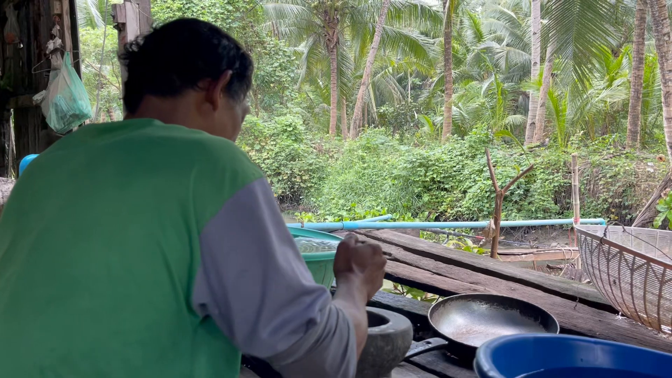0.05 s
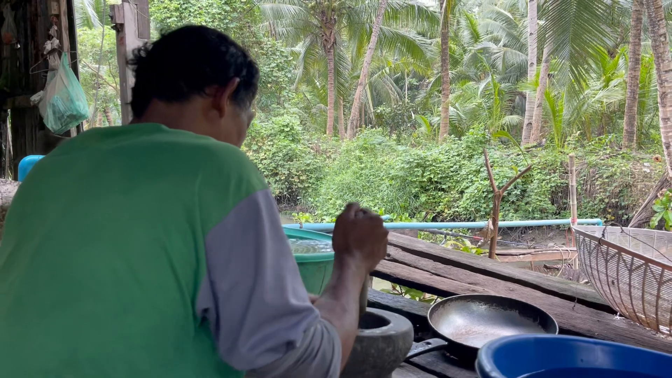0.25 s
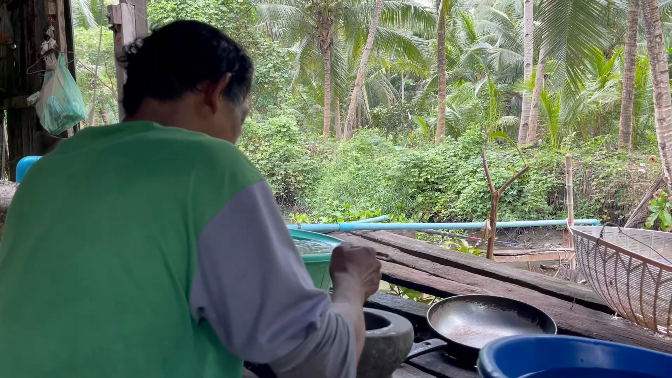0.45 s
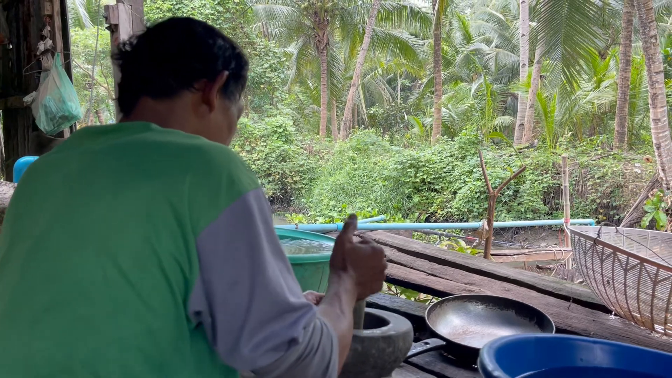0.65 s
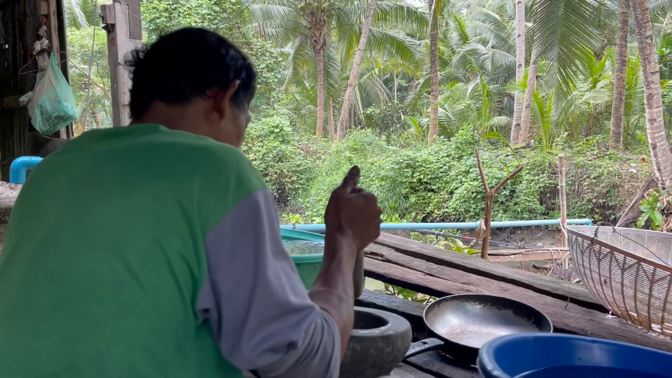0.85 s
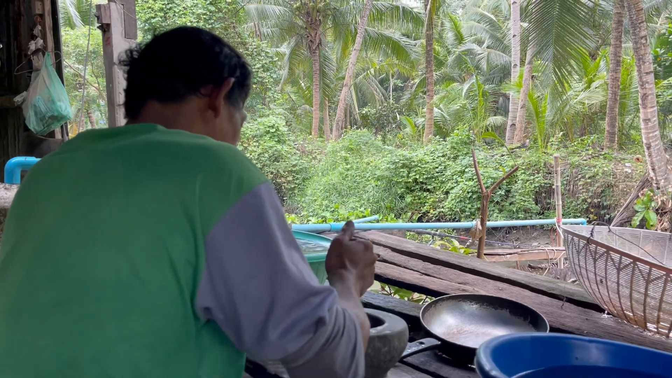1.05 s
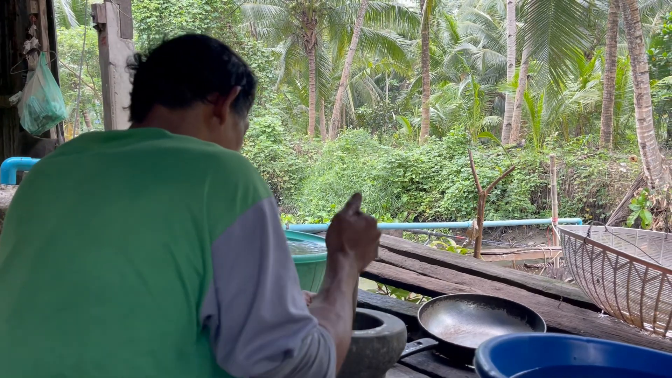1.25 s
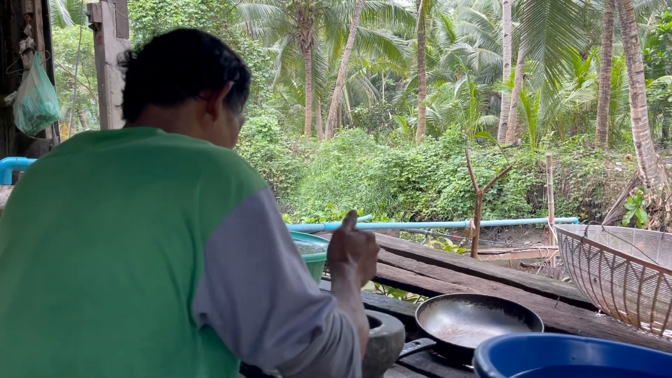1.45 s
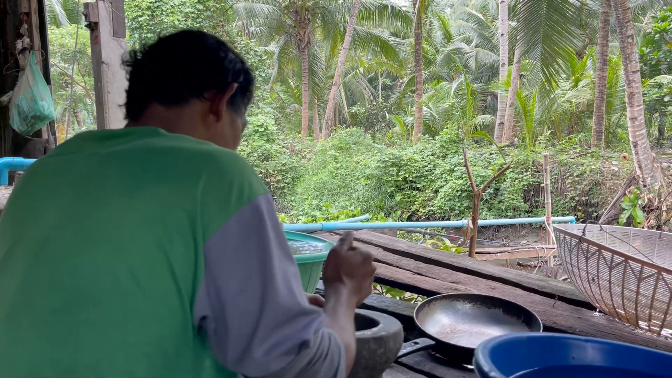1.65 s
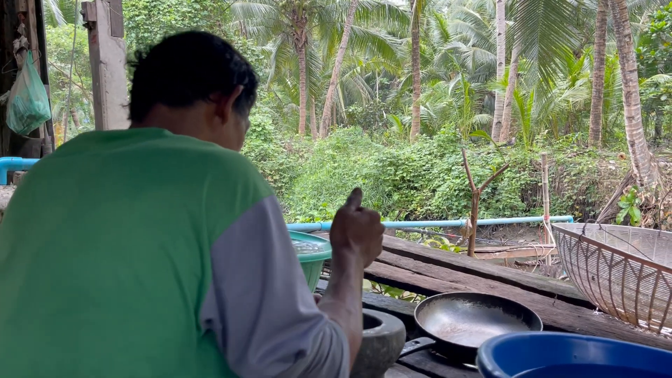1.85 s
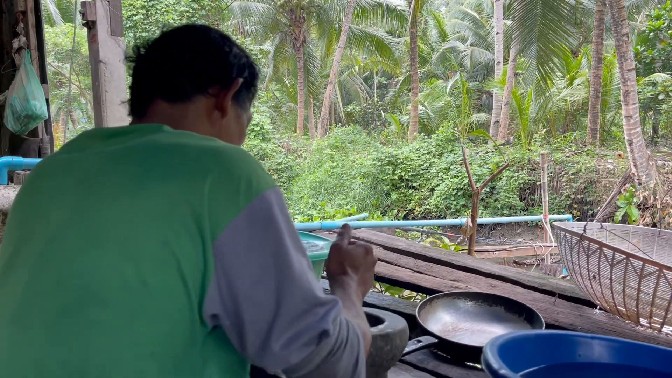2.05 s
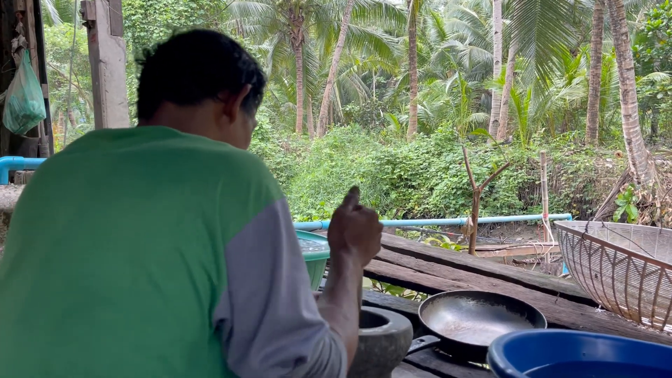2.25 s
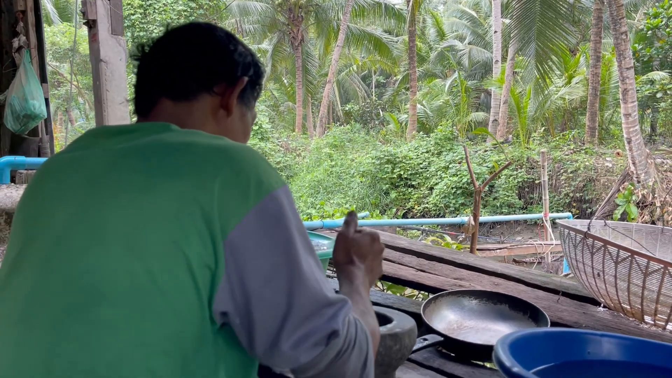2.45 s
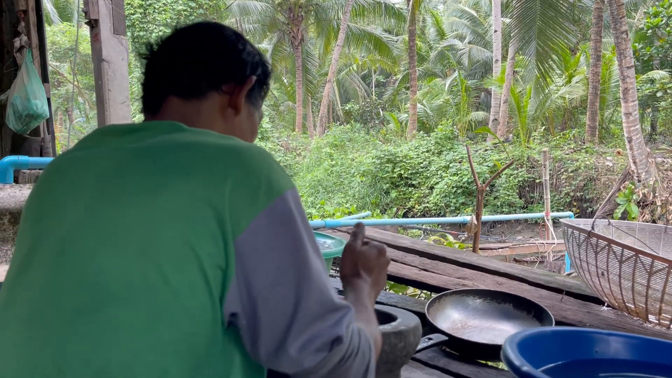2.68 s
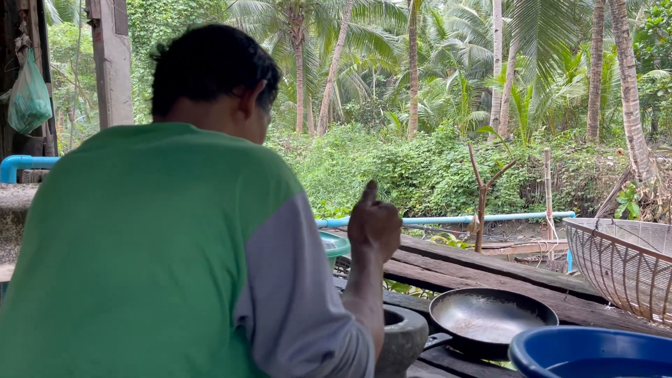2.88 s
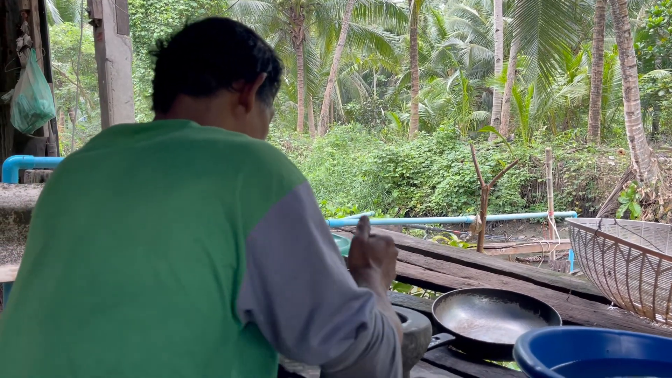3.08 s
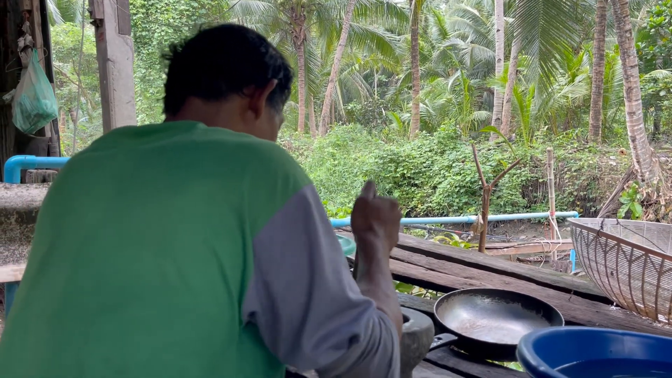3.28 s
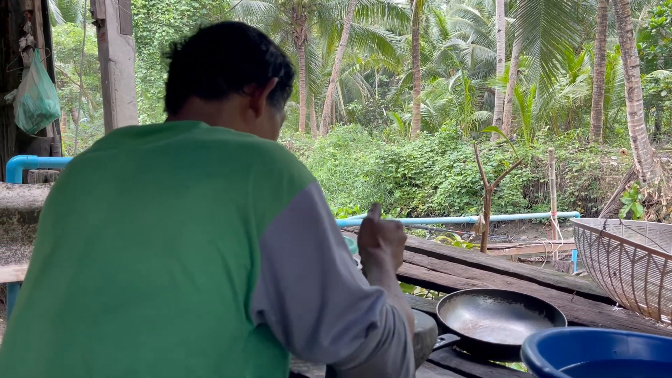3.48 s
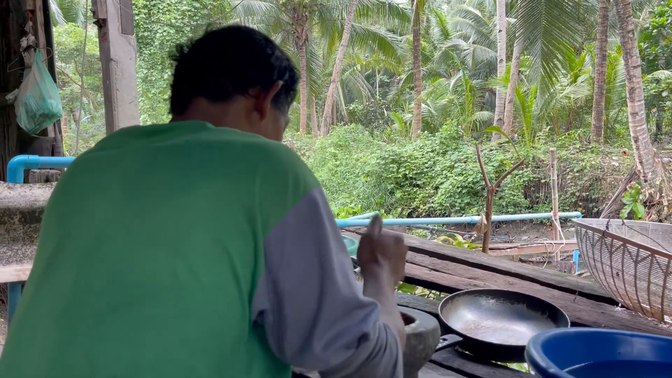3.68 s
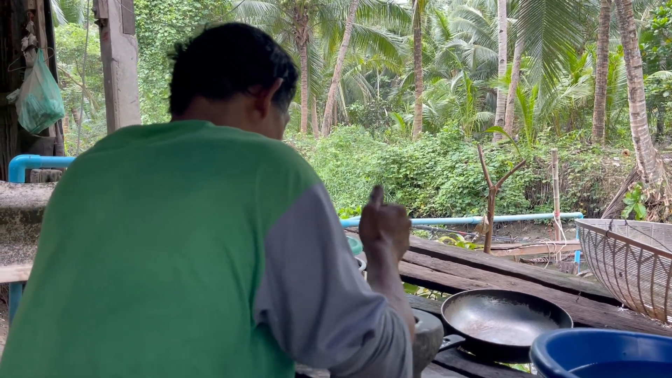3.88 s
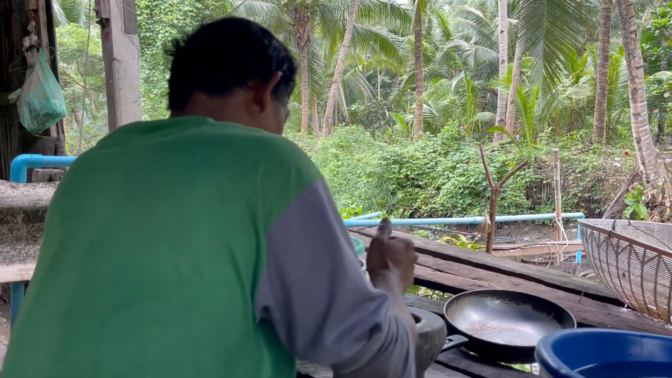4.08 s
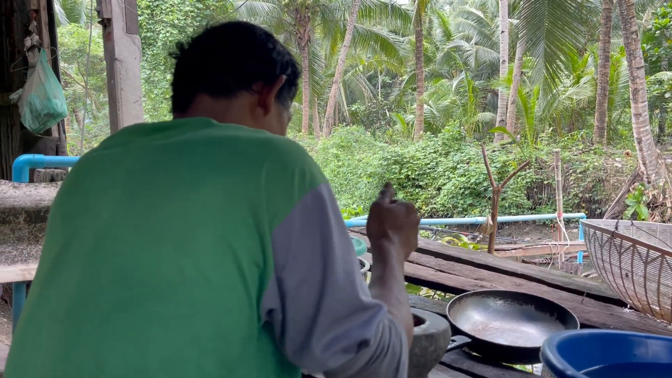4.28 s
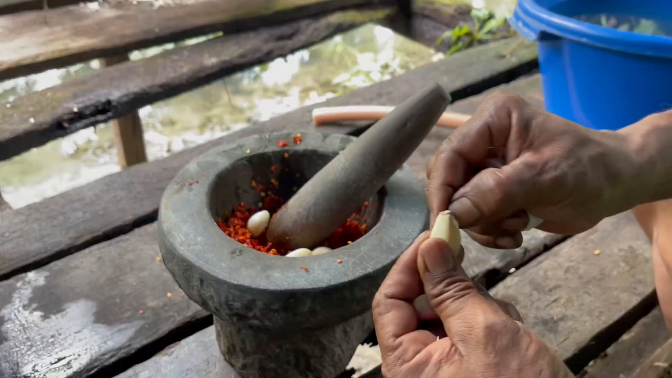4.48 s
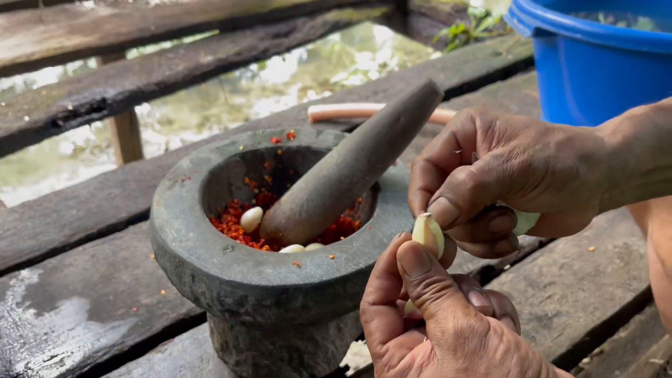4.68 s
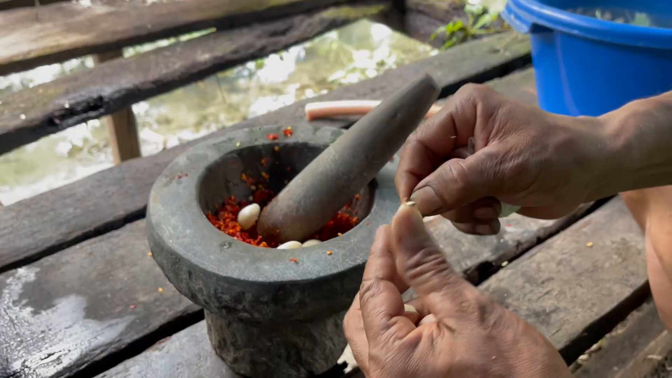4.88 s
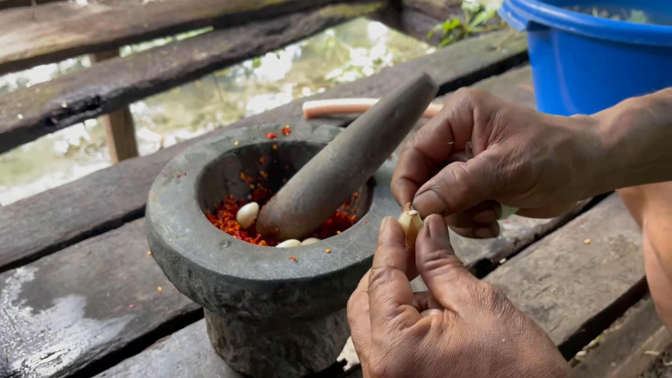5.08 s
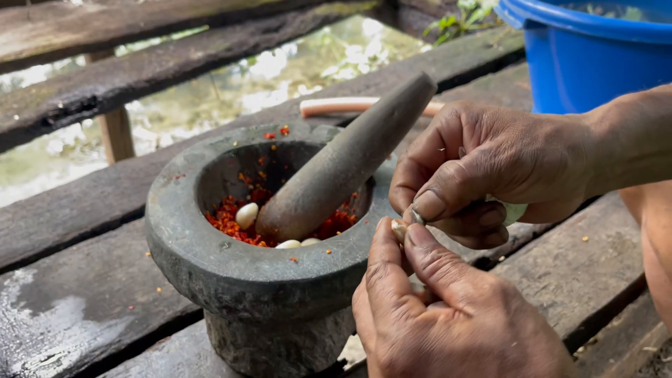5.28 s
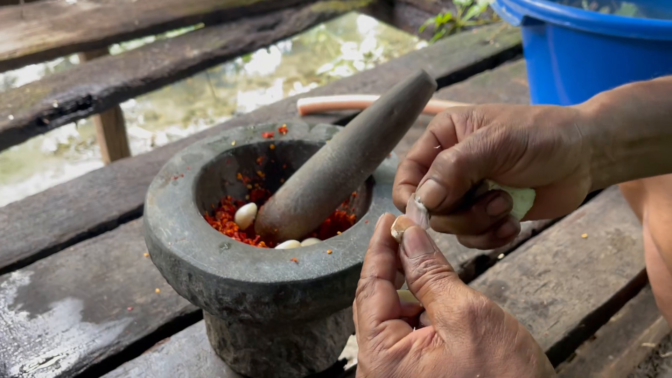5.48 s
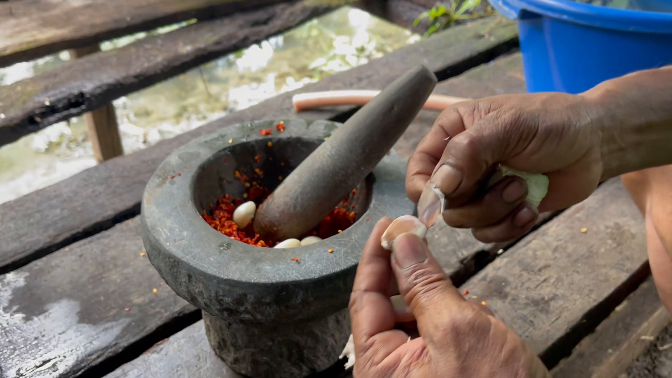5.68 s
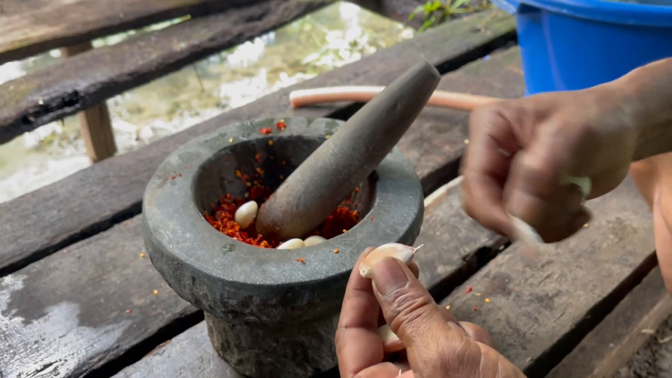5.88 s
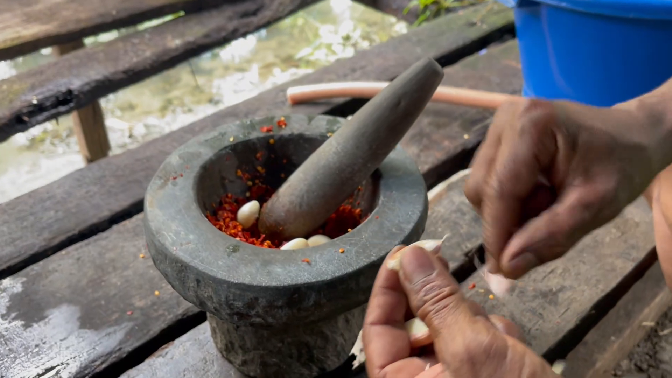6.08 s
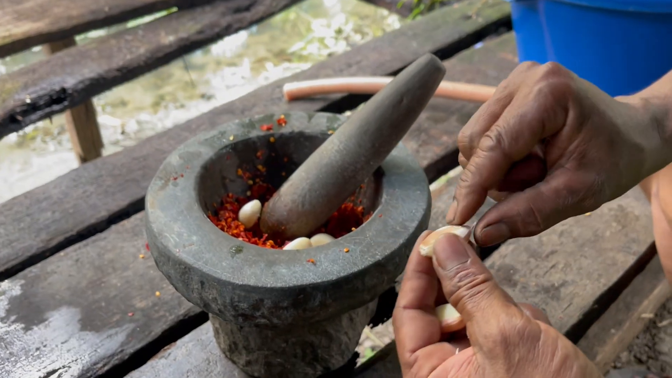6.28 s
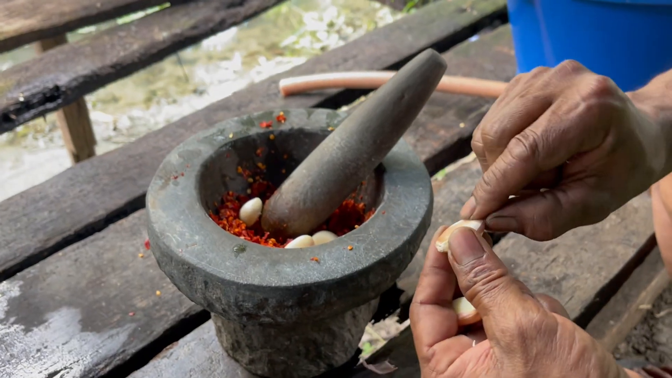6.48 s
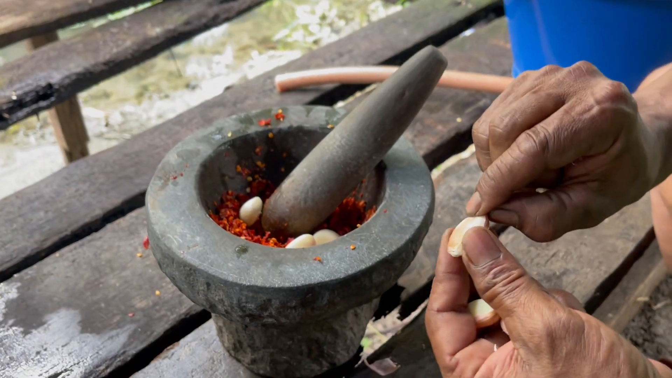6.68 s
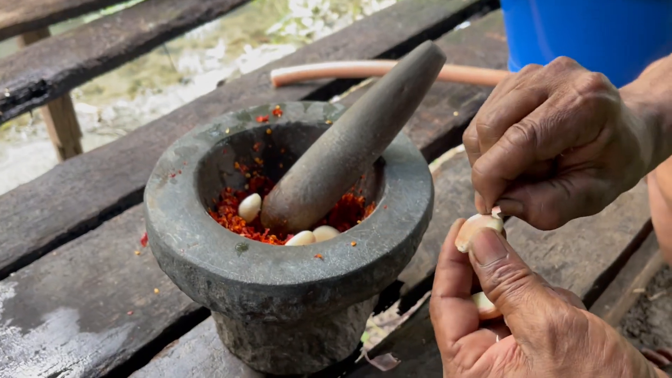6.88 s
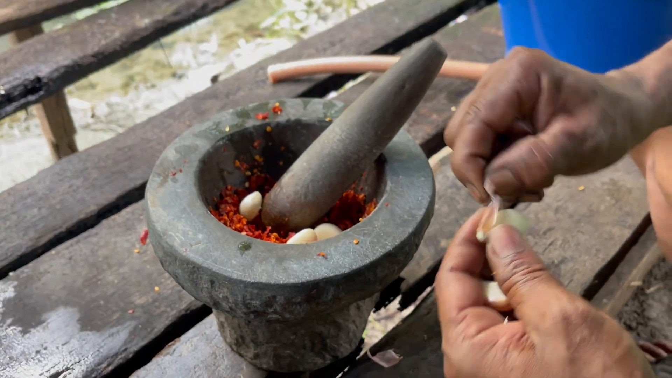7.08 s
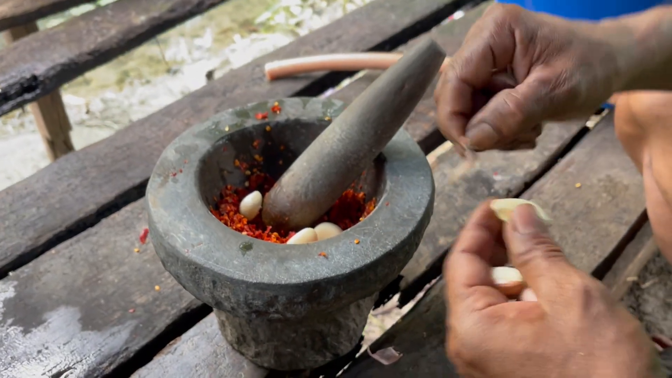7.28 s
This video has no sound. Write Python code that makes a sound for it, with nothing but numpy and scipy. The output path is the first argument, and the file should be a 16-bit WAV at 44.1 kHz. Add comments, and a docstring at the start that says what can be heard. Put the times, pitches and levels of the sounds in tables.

```python
"""A plank deck under an open roof among trees: a stone pestle pounds dried chillies in a stone mortar.
After a cut the two-port microphone is close to hands peeling garlic; a loose board chatters and knocks.
An engine drones far away in both parts, behind the noise of leaves, insects and distant rumble.
Impacts are impulses driving dying sines, rubs and rasps are coloured grains of noise,
the engine is a few wavering sines, and the yard answers with late scattered reflections."""
import sys
import numpy as np
from scipy import signal
from scipy.fft import rfft, irfft
from scipy.io import wavfile
from scipy.ndimage import uniform_filter1d

SR = 44100
rng = np.random.default_rng(int(sys.argv[2]) if len(sys.argv) > 2 else 0)


def put_to_file(sound):
    """Save the sound as 16-bit audio at rate SR, in the file named by the first command-line argument."""
    columns = np.atleast_2d(sound).T  # one column per channel
    safe = np.clip(columns, -1, 1)
    whole_steps = np.round(safe * 32767)
    wavfile.write(sys.argv[1], SR, whole_steps.astype(np.int16))


N = 324042

# Silence between the two parts: (start t/s, end t/s)
CUT = (4.4535, 4.4855)
# Air colour of the two parts, each: (f/Hz, relative level/dB per Hz)
AIR_COLOURS = [
    [(12, -41.5), (20, -17.5), (88, -4.5), (222, -22.5), (802, -27), (1000, -27.5), (1290, -29),
     (1610, -34), (1860, -32), (3740, -40.5), (8890, -39), (11400, -41.5), (16000, -89)],
    [(12, -52.5), (20, -6), (70, -0.5), (150, -13), (377, -16), (485, -23.5), (923, -27.5), (2390, -40.5),
     (4060, -43), (6180, -55), (9140, -38.5), (13500, -61.5), (16000, -61)],
]
# Air loudness: (t/s, level/dB)
AIR_LEVEL = [(0, -55), (4.45, -51), (4.49, -47.5), (5.5, -52), (6.2, -52.5), (7.35, -52)]
# Far engine, one list for each part: (t/s, firing rate f/Hz, level/dB)
ENGINE_RUNS = [
    [(0.0, 83.87, -55), (2.27, 93.8, -52), (3.3, 100, -51), (4.46, 101.2, -52.5)],
    [(4.48, 70.7, -47), (5.5, 72, -49.5), (6.22, 70.44, -54), (6.5, 61.97, -54.5), (7.35, 59, -51.5)],
]
# Engine orders: (multiple of the firing rate, relative level/dB)
ENGINE_ORDERS = [(.5, -8), (1, 2.5), (2, -10), (2.5, -14.5), (3.5, -23)]
# Thin hiss, perhaps insects: (start t/s, swell t/s, hold t/s, fade t/s, level/dB)
THIN_HISSES = [(5.85, .1, 0.92, .1, -76)]
# Colour of the thin hiss: (f/Hz, relative level/dB)
THIN_COLOUR = [(3000, -40), (3600, -8), (3950, 0), (4300, -10), (5000, -40)]

# Phase between the microphone ports: (f/Hz, lead of the left port/rad)
PORT_LEAD = [(20, 0), (3000, .6), (8000, .8), (11700, -6.2), (16400, -12.7)]
# Left-right likeness of diffuse sound: (f/Hz, likeness 0 to 1)
PORT_LIKENESS = [(60, 1), (300, 0.61), (1500, 0.17), (4000, 0.52), (9000, 0.77)]
# Late reflections of the yard: (f/Hz, t60/s)
YARD_DECAY = [(100, .4), (300, .36), (800, .27), (2000, .3), (5000, .2), (12000, .15)]
# Nearby boards, posts and roof: (delay t/ms, left level/dB, right level/dB)
NEAR_ECHOES = [(2.52, -40, -14), (4.69, -19, -9), (6.26, -10, -40), (9.76, -8, -8), (13.42, -19, -40),
               (17.48, -18, -15), (20.6, -22, -19), (23.62, -40, -29), (28.17, -24, -33), (33.05, -20, -40),
               (37.85, -26, -40), (41.47, -24, -27)]

# Short rasps, perhaps something dragged: (start t/s, swell t/s, hold t/s, fade t/s, level/dB)
RASP_STROKES = [(.64, .12, .13, 0.11, -61.5), (4.726, 0.02, 0.0266, 0.12, -43.5)]
# Rasp colour after the cut: (f/Hz, relative level/dB per Hz)
RASP_COLOUR = [(290, -40), (500, -8.5), (645, -13.5), (719, -4.5), (1150, -24), (1220, -17), (1700, -1.5),
               (2130, -6), (2620, -15.5), (2960, -4), (3140, -27), (4920, -14), (5350, -18.5), (9000, -17),
               (11700, -54), (19800, -120)]
# Colour of the fainter rasp before the cut: (f/Hz, relative level/dB per Hz)
SCUFF_COLOUR = [(530, -28), (900, 1), (998, -17.5), (1260, -0.5), (1610, -15.5), (1880, -9.5),
                (2170, -17.5), (2510, -2), (2940, -15.5), (6000, -25), (7800, -54.5), (13200, -120)]
# Hollow bump at the start of a rasp: (f/Hz, relative level/dB, t60/s)
BUMP_MODES = [(330, 13, .03), (770, 4.5, 0.082), (1440, 2, .025), (1900, -5, .02)]

# Touches of a metal pan: (t/s, level/dB)
PAN_TOUCHES = [(4.513, -46)]
# Modes of the pan: (f/Hz, relative level/dB, t60/s)
PAN_MODES = [(460, 0.00056, 0.38)]
# Knocks of the loose board: (t/s, body level/dB, click level/dB)
BOARD_KNOCKS = [(4.311, -24, -63), (4.51, -45, -62), (4.635, -41, -64), (5.582, -43, -48),
                (5.682, -38, -40), (6.03, -32, -46), (6.066, -31.5, -57), (6.12, -29.5, -47),
                (6.185, -28.5, -51), (6.232, -31.5, -60), (6.298, -26, -61), (6.335, -28.5, -39),
                (6.385, -32, -53), (6.423, -34.5, -62), (6.451, -32, -45), (6.481, -35, -52),
                (6.514, -41, -60), (6.555, -37, -65), (6.59, -33, -58), (6.600, -22.5, -27.5),
                (6.6064, -14.5, -22.5), (6.6115, -12.5, -24), (6.646, -33, -66), (6.879, -35.5, -55),
                (6.916, -16.5, -21), (6.935, -32.5, -60), (6.955, -39.5, -60), (7.2151, -14.5, -20),
                (7.230, -25.5, -46), (7.302, -37, -56)]
# Modes of the board: (f/Hz, relative level/dB, t60/s)
BOARD_MODES = [(110, -4.5, 0.022), (185, -16.5, 0.014), (391, 0.5, 0.015), (483, 8.5, 0.018),
               (605, 7.5, 0.014), (795, 0.5, 0.0084), (1227, -15, 0.0072), (1750, -15, 0.0051)]
# Colour of the wood-on-wood click: (f/Hz, relative level/dB)
TICK_COLOUR = [(600, -30), (1300, -7.5), (2500, 11), (3500, 1.5), (4500, -5.5), (6000, -12.5), (8000, 1),
               (12000, -16.5), (14000, -40)]

# Dry stuff rubbed by fingers or pestle:
# (start t/s, swell t/s, hold t/s, fade t/s, fine hiss level/dB, coarser scratch level/dB)
RUB_STROKES = [(0.854, 0.0039, .004, 0.062, -38, -59.5), (2.543, 0.011, .001, 0.089, -53.5, -57),
               (3.306, 0.019, .01, 0.18, -45, -39.5), (3.406, 0.0046, .01, .06, -59.5, -51),
               (3.673, 0.009, 0.0054, 0.08, -43.5, -45), (3.862, 0.044, 0.028, .09, -56.5, -61.5),
               (4.466, 0.0015, 0.18, 0.086, -58.5, -99), (4.715, 0.013, 0.0011, 0.07, -50, -50),
               (5.156, 0.03, 0.0012, 0.069, -35.5, -55), (5.273, 0.017, .001, 0.04, -65, -52.5),
               (5.28, 0.14, 0.021, 0.11, -51, -66), (5.562, 0.028, 0.13, 0.053, -50.5, -53),
               (5.76, .01, .001, 0.049, -63, -66), (5.866, 0.016, 0.056, 0.045, -66.5, -69),
               (6.018, 0.06, 0.0093, 0.03, -62.5, -63), (6.592, 0.085, 0.21, 0.035, -69, -82),
               (6.86, 0.024, .02, 0.21, -56.5, -58), (7.0, 0.016, 0.057, 0.17, -52, -63),
               (7.296, 0.0044, 0.00091, .1, -56, -58)]
# Fingers never quite still: (fine level/dB, coarse level/dB)
FIDGET = -81, -74
# Louder cracks of garlic skin: (t/s, fine part level/dB, coarse part level/dB)
SKIN_CRACKS = [(4.4865, -40, -57), (4.5132, -31.5, -70), (4.6024, -47.5, -80), (4.634, -48, -76),
               (5.1257, -53.5, -67), (5.164, -23.5, -52), (5.1765, -18, -61), (5.1814, -23.5, -56),
               (5.187, -28, -63), (5.1914, -20, -64), (5.2037, -40, -61), (5.228, -38, -51),
               (5.6822, -27.5, -37), (5.7136, -31, -64), (5.7256, -45, -48), (5.7428, -32.5, -46),
               (5.747, -36, -63), (6.084, -49, -63), (6.331, -56, -44), (6.7661, -47, -65),
               (6.7746, -47, -54), (6.8354, -29.5, -56), (6.8748, -49, -52), (6.9409, -27, -63),
               (6.951, -39, -69), (7.0107, -31, -69), (7.0193, -27, -74), (7.0437, -35, -61),
               (7.0778, -35, -54), (7.1255, -31, -38.5), (7.1317, -37, -43)]
# Colour of garlic skin: (f/Hz, relative level/dB)
SKIN_COLOUR = [(500, -31), (1500, -27.5), (4000, -6.5), (6500, -7.5), (9000, 6), (11500, 8.5), (13500, -6),
               (15500, -15), (16500, -26.5)]
# Chilli pods shifting, duller than garlic skin: (f/Hz, relative level/dB)
POD_COLOUR = [(880, -56.5), (1500, -25), (2510, -13), (4370, -26), (7760, -17.5), (9010, 0.5),
              (11500, -19.5), (16000, -95.5)]
# Colour of the coarse scratch: (f/Hz, relative level/dB)
SCRATCH_COLOUR = [(500, -5.5), (1200, -1), (2500, -3), (4000, -5), (6000, -7), (9000, -15.5)]

# Pestle dropping against the rim after the glancing blow: (t/s, level/dB)
RIM_TOUCHES = [(3.417, -23), (3.53, -55), (3.545, -55)]
# Modes of the rim: (f/Hz, relative level/dB, t60/s)
RIM_MODES = [(156, -7, .07), (390, 2, .028), (581, -4, .04), (2130, -14, .012), (2570, -7, .015),
             (3330, -16, .01), (4200, -18, .008)]
# Modes of the deck planks: (f/Hz, relative level/dB, t60/s)
DECK_MODES = [(52, -6.5, 0.65), (92.8, 2, 0.21), (142.3, 0.5, 0.12), (211, 7, .1), (236, 9.5, 0.076),
              (307.2, 9, .1), (332, 11, 0.091), (446, 11.5, 0.026), (479, 8, 0.059)]
# Loose things on the deck: (f/Hz, relative level/dB, t60/s)
LOOSE_MODES = [(413, 2, 0.015), (595, 0, 0.021), (854, 2.5, 0.019), (1300, -6.5, 0.016), (1800, -10, 0.005)]
# Colour of crushed chilli: (f/Hz, relative level/dB)
CHILLI_COLOUR = [(500, 13.5), (2000, 4.5), (4500, -5), (7000, -7.5), (9000, -3.5), (12000, -8.5),
                 (13500, -25.5), (17000, -32.5)]
# Pestle blows: (t/s, thud level/dB, stone-on-stone clack level/dB, chilli crunch level/dB, deck shake level/dB)
PESTLE_BLOWS = [(.0012, -9.5, -26.5, -33.5, -34), (0.3371, -3, -18.5, -32.5, -33.5),
                (0.9586, -2, -15.5, -32.5, -31), (1.2954, -3.5, -23, -34, -31.5),
                (1.6326, -1, -10.5, -32, -33.5), (1.9641, 0.5, -5.5, -32.5, -34),
                (2.3082, -2.5, -13.5, -35, -32.5), (2.6444, -6, -21, -31.5, -32.5),
                (2.9723, -1.5, -10, -36.5, -33.5), (3.332, -21.5, -5, -30, -61),
                (3.689, -11, -70.5, -35.5, -37), (3.99, -39.5, -59.5, -49, -39),
                (4.032, -2.5, -13, -29.5, -34), (4.3704, -2.5, -9, -31, -37.5)]
# Air and walls of the bowl: (f/Hz, relative level/dB, t60/s)
BOWL_MODES = [(762, 27, .0102), (629, 6.5, .0137), (1094, -4.5, .0214)]
# Heavy foot of the mortar: (f/Hz, relative level/dB, t60/s)
FOOT_MODES = [(392, -24.5, 0.042), (1146, -9.5, .018), (1250, -26, 0.0037)]
# Pestle and rim: (f/Hz, relative level/dB, t60/s)
STONE_MODES = [(989, -6.5, 0.026), (1410, 4.5, 0.0069), (1630, 0, 0.0077), (1790, -3, 0.0082),
               (2024, -11, 0.0093), (2375, -16.5, 0.00615), (3000, -9.5, 0.0048), (3660, -39, 0.031)]

SWELL_DB = 25  # depth of a swell or fade
SPRAY_T60_S = 0.014  # noise spray of a crack
SMALL_PER_S, SMALL_DB = 49, -0.5  # small cracks, level over the hiss of the rub


def amp(db):
    return 10 ** (np.asarray(db) / 20)


def evened(x):
    """Scales to an RMS of one."""
    return x / np.sqrt(np.mean(x ** 2) + 1e-20)


def read(points, hz):
    """Value of a spectrum table, straight on a log-frequency axis."""
    f, value = np.transpose(points)
    return np.interp(np.log(hz + 1), np.log(f + 1), value)


def level(tables):
    """Summed gain over time from tables of (t/s, level/dB), each silent outside its own span."""
    t = np.arange(N) / SR
    return sum(amp(np.interp(t, *np.transpose(rows)[:2], left=-200, right=-200)) for rows in tables)


def strokes(rows, db):
    """Gain over time of strokes that swell, hold and fade."""
    tables = []
    for row, top in zip(rows, db):
        corners_db = [top - SWELL_DB, top, top, top - SWELL_DB]
        tables.append(np.transpose([np.cumsum(row[:4]), corners_db]))
    return level(tables)


def train(s, db):
    """Impulses at the given times."""
    out = np.zeros(N)
    at = np.clip(np.round(np.asarray(s) * SR).astype(int), 0, N - 1)
    np.add.at(out, at, amp(db))
    return out


def ring(modes, rise, size=22050):
    """Sum of dying sines that take the time rise (s) to build up."""
    t = np.arange(size) / SR
    swell = (1 - np.exp(-t / rise)) ** 2
    return swell * sum(amp(db - 60 * t / t60) * np.sin(2 * np.pi * hz * t) for hz, db, t60 in modes)


def through(x, response):
    return signal.fftconvolve(x, response)[:N]


def grains(per_s, spread_db):
    """Dense tiny cracks of very unequal size."""
    size = amp(spread_db * np.minimum(rng.exponential(1, N), 5))
    present = rng.random(N) < per_s / SR
    return evened(size * present * rng.standard_normal(N))


def cracking(clicks):
    """Each crack is one sharp click and a short spray of noise."""
    spray = through(clicks, amp(-60 * np.arange(3000) / SR / SPRAY_T60_S))
    return spray * rng.standard_normal(N) + amp(5) * clicks


def patchy(x, db):
    """Random patches of pitch and time are made louder or softer."""
    z = signal.stft(x, nperseg=256)[2]
    field = rng.standard_normal(z.shape[-2:])
    field = evened(uniform_filter1d(uniform_filter1d(field, 3, 0), 6, 1))
    gain = amp(db * field)
    gain /= np.sqrt(np.mean(gain ** 2))
    return signal.istft(z * gain, nperseg=256)[1][..., :N]


def ports(x, colour, other=None):
    """Colours a sound and spreads it over the two ports; other is the part that only the right port hears."""
    hz = np.fft.rfftfreq(N, 1 / SR)
    gain = amp(read(colour, hz))
    gain /= np.sqrt(np.mean(gain ** 2))
    left = right = rfft(x)
    if other is not None:
        same = np.clip(read(PORT_LIKENESS, hz), 0, 1)
        right = same * left + np.sqrt(1 - same ** 2) * rfft(other)
    turn = np.exp(.5j * read(PORT_LEAD, hz))  # half the lead on each side
    return irfft(gain * np.array([left * turn, right / turn]), N)


def yard(x):
    """Scattered late reflections from trunks and roof, each band dying at its own speed."""
    hz, t, z = signal.stft(rng.standard_normal((2, SR // 2)), SR, nperseg=128)
    decay = amp(-60 * t / read(YARD_DECAY, hz)[:, None])
    tail = signal.istft(z * decay, SR, nperseg=128)[1]
    tail = tail + 0.67 * tail.mean(0)  # a part common to both ports
    tail *= np.clip(np.arange(tail.shape[1]) / SR / 0.0013, 0, 1)
    return signal.fftconvolve(x[None], tail / np.linalg.norm(tail[0]), axes=1)[:, :N]


def air():
    """Leaves, insects and distant rumble as steady coloured noise: another colour after the cut."""
    noise = rng.standard_normal((4, N))
    before = ports(noise[0], AIR_COLOURS[0], noise[1])
    after = ports(noise[2], AIR_COLOURS[1], noise[3])
    return np.where(np.arange(N) / SR < np.mean(CUT), before, after) * level([AIR_LEVEL])


def engine():
    """Far off: low orders of the firing rate, wavering on their way through the air."""
    out, t = np.zeros(N), np.arange(N) / SR
    for rows in ENGINE_RUNS:
        s, hz, db = np.transpose(rows)
        cycles = np.cumsum(np.interp(t, s, hz)) / SR
        run_gain = level([np.transpose([s, db])])
        for order, order_db in ENGINE_ORDERS:
            waver = uniform_filter1d(uniform_filter1d(rng.standard_normal(N), 2500), 2500)
            order_gain = amp(order_db + 2.2 * evened(waver))
            out += np.sin(2 * np.pi * (order * cycles + rng.random())) * order_gain * run_gain
    return out


def thin_hiss():
    """A thin hiss, perhaps insects: noise in a narrow band."""
    gain = strokes(THIN_HISSES, np.transpose(THIN_HISSES)[4])
    return patchy(ports(gain * rng.standard_normal(N), THIN_COLOUR), db=3)


def rasps():
    """A hollow bump, then grainy noise whose resonances come and go in patches."""
    start, *_, db = np.transpose(RASP_STROKES)
    loud = strokes(RASP_STROKES, db)
    near = np.arange(N) / SR > CUT[1]
    bump = through(train(start + 0.00186, db), ring(BUMP_MODES, rise=.001, size=4096))
    left, right = loud * grains(6000, 1.5), loud * grains(6000, 1.5)
    rough = ports(near * left, RASP_COLOUR, near * right)
    rough += ports(~near * left, SCUFF_COLOUR, ~near * right)
    return bump + patchy(rough, db=3)


def pan():
    """A metal pan is touched and rings."""
    return through(train(*np.transpose(PAN_TOUCHES)), ring(PAN_MODES, rise=.002))


def board():
    """Knocks travel along the board as bending waves, treble first; they reach the right port first."""
    s, db, click_db = np.transpose(BOARD_KNOCKS)
    body = np.zeros(N)
    uneven_db = 1.5 * rng.standard_normal((len(s), len(BOARD_MODES)))  # each knock lands on another spot
    for mode, spot_db in zip(BOARD_MODES, uneven_db.T):
        behind = .07 * (1 / np.sqrt(mode[0]) - 1 / np.sqrt(490))  # s, against a wave of 490 Hz
        body += through(train(s + behind, db + spot_db), ring([mode], rise=0.0014, size=4096))
    t = np.arange(200) / SR
    tick = through(train(s, click_db), amp(-60 * t / 0.0037)) * rng.standard_normal(N)
    knock = body + ports(tick, TICK_COLOUR)
    knock[0] = np.roll(knock[0], 9)  # samples
    return knock + amp(-21.5) * yard(body)


def rubbing():
    """Cracks over a grainy rustle, fine and coarse: garlic skin close by after the cut, chilli pods before."""
    s, fine_db, coarse_db = np.transpose(SKIN_CRACKS)
    near = np.arange(N) / SR > CUT[1]
    hiss = strokes(RUB_STROKES, np.transpose(RUB_STROKES)[4]) + near * amp(FIDGET[0])
    scratch = strokes(RUB_STROKES, np.transpose(RUB_STROKES)[5]) + near * amp(FIDGET[1])

    small_gain = amp(SMALL_DB + 3 * rng.standard_normal(N))
    small = hiss * small_gain * (rng.random(N) < SMALL_PER_S / SR)
    cracks = ports(cracking(train(s, fine_db) + small), SKIN_COLOUR)
    cracks += ports(cracking(train(s, coarse_db)), SCRATCH_COLOUR)

    left, right = hiss * grains(5500, 1.4), hiss * grains(7000, 2.0)
    rustle = ports(near * left, SKIN_COLOUR, near * right)
    rustle += ports(~near * left, POD_COLOUR, ~near * right)
    rustle += ports(scratch * grains(3000, 1.9), SCRATCH_COLOUR, scratch * grains(3000, 3.6))
    return cracks + patchy(rustle, db=4.2)


def slip():
    """Light knocks of stone on the rim, each with a short chatter after it."""
    touch = train(*np.transpose(RIM_TOUCHES))
    chatter_gain = through(touch, amp(-27 - 60 * np.arange(4000) / SR / .08))
    chatter = chatter_gain * grains(1500, 2.0)
    knock = through(touch + chatter, ring(RIM_MODES, rise=.0004, size=8192))
    return knock + amp(-16) * yard(knock)


def deck():
    """Every blow shakes the planks; the mortar rebounds once and loose things rattle."""
    s, _, _, _, shake_db = np.transpose(PESTLE_BLOWS)
    t = np.arange(12000) / SR
    rebound_s = s + 0.055 + .008 * rng.standard_normal(len(s))
    shake = train(s, shake_db) + train(rebound_s, shake_db - 13)
    planks = through(shake, ring(DECK_MODES, rise=0.002))
    rattle = through(train(s + .01, shake_db), amp(-60 * t / .35)) * grains(1000, 2.6)
    loose = amp(-22.5) * through(rattle, ring(LOOSE_MODES, rise=0.00022, size=2048))
    direct = np.array([planks + loose, planks + np.roll(loose, 6)])  # the rattle reaches the left port first
    return direct + amp(-8.5) * patchy(yard(planks + loose), db=2.5)


def crunch():
    """A burst of crunching noise around each blow, then a quick decay and a longer, weaker one."""
    s, _, _, crunch_db, _ = np.transpose(PESTLE_BLOWS)
    lead_s = .011  # the noise starts this long before the blow
    t = np.arange(9000) / SR - lead_s
    decay = amp(-60 * t / 0.13) + amp(-12.5 - 60 * t / 0.56)
    shape = np.where(t < 0, amp(7.5 + 1800 * t), decay)
    loud = through(train(s - lead_s, crunch_db), shape)
    return patchy(ports(loud * grains(11000, 1.6), CHILLI_COLOUR, loud * grains(11000, 1.1)), db=1.5)


def mortar():
    """A thud that builds up in the bowl over a few cycles, and a clack where stone meets stone."""
    s, thud_db, clack_db, _, _ = np.transpose(PESTLE_BLOWS)
    blows = train(s, thud_db)
    thud = -through(blows, ring(BOWL_MODES, rise=.004, size=4096))
    thud -= through(blows, ring(FOOT_MODES, rise=0.0013, size=4096))
    clack = -through(train(s + 0.00038, clack_db), ring(STONE_MODES, rise=0.00033, size=4096))
    direct = thud + clack
    out = np.array([direct, direct])
    echoed = thud + amp(-1.5) * clack  # soft surfaces dull the echo
    for ms, left_db, right_db in NEAR_ECHOES:
        late = round(ms * SR / 1000)
        out[:, late:] += amp([[left_db], [right_db]]) * echoed[:N - late]
    return out + patchy(yard(amp(-17) * thud + amp(-11.5) * clack), db=5.5)


def scene():
    """All sources from far to near; the cut silences whatever still rings."""
    t = np.arange(N) / SR
    background = air() + engine() + thin_hiss()
    handling = rasps() + pan() + board() + rubbing()
    pounding = (slip() + deck() + crunch() + mortar()) * (t < CUT[1])
    gate = np.clip(np.maximum(CUT[0] - t, t - CUT[1]) / 0.00073, 0, 1)
    return (background + handling + pounding) * gate


def record(dry):
    """The microphone loses the deepest bass and rounds off the highest peaks; then the band limit."""
    bass_cut = signal.butter(4, 40, "high", fs=SR, output="sos")
    rounded = 1.3 * np.tanh(signal.sosfilt(bass_cut, dry) / 1.3)
    band_limit = signal.firwin(511, 16500, window=("kaiser", 9), fs=SR)  # edge f/Hz
    return signal.oaconvolve(rounded, band_limit[None], "same")


dry = scene()
out = record(dry)
put_to_file(out)
```